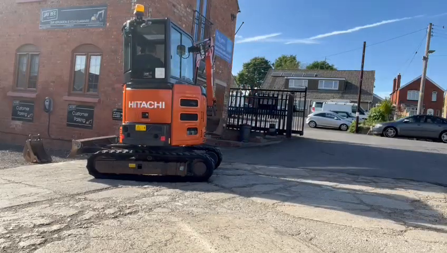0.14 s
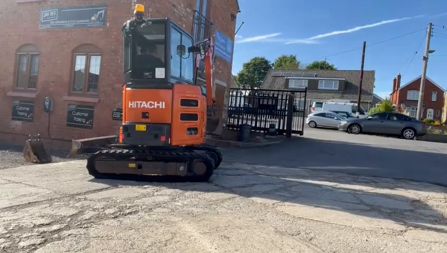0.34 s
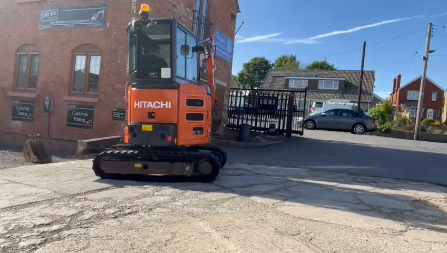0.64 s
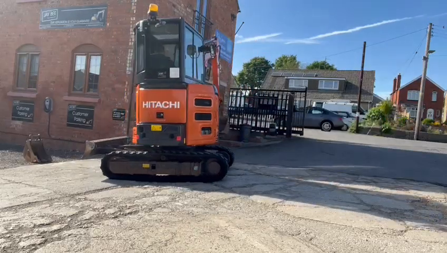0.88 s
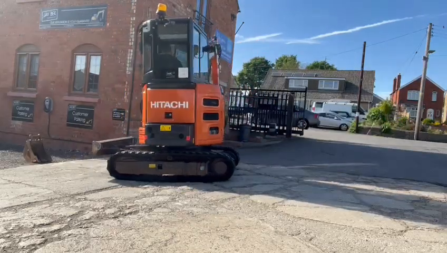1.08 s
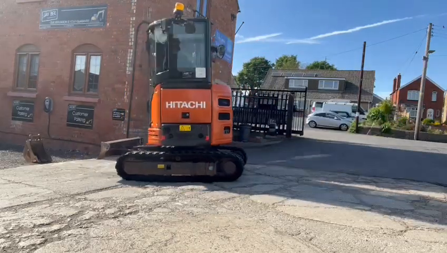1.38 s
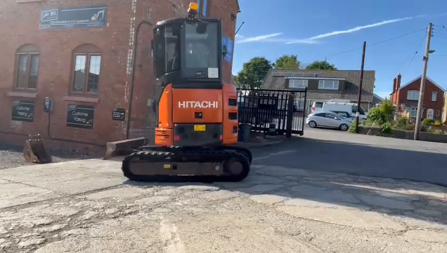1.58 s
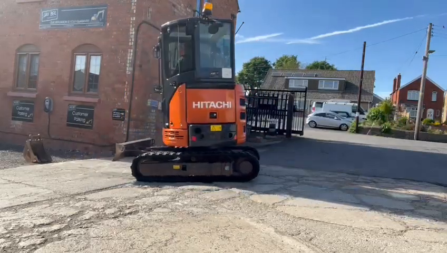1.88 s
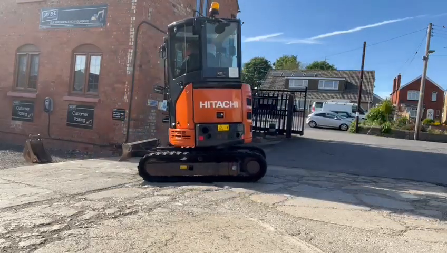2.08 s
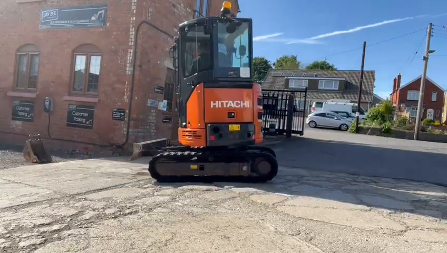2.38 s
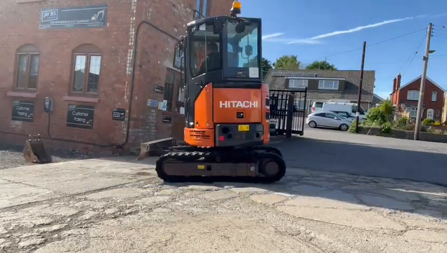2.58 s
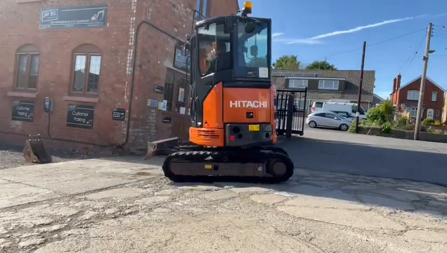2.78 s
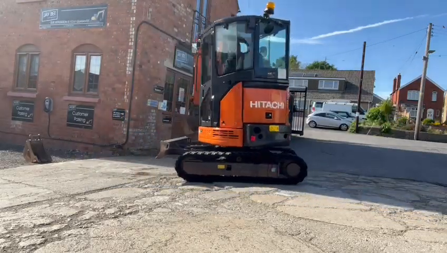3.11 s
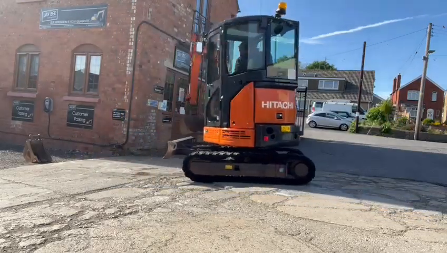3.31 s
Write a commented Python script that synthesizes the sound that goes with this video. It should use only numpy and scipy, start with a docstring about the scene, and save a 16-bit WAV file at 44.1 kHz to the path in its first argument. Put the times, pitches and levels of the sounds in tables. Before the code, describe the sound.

A small digger's diesel engine sags and swells as it turns, its tracks clanking.

```python
"""A mini excavator's three-cylinder diesel sags under hydraulic load and recovers as it turns in a yard.
Exhaust drone and injection knock, both locked to the firings, swell as the engine end swings towards us.
Fan and pump add roar and hiss, and a valve hisses briefly. The tracks clack over broken concrete and
ring their steel, while dull thumps come through a low rumble."""
import sys
import numpy as np
from scipy import signal
from scipy.fft import rfft, irfft, next_fast_len
from scipy.io import wavfile
from scipy.ndimage import uniform_filter1d

SR = 44100
rng = np.random.default_rng(int(sys.argv[2]) if len(sys.argv) > 2 else 0)


def persist_wave(psi):
    """Save psi, clipped to +-1, as 16-bit WAV."""
    counts = np.round(np.clip(psi, -1, 1) * 32767).astype(np.int16)
    wavfile.write(sys.argv[1], SR, np.atleast_2d(counts).T)


N = 152145
T = np.arange(N) / SR
CYLINDERS = 3
KNOCK_DELAY = 0.21  # share of a firing interval from exhaust pulse to knock
SILENCER_LAG_RAD = -.73  # phase at the firing rate; grows with frequency squared
MIC_SPLIT_HZ, MIC_TREBLE_RAD = 6300, -2.17  # above the split, left and right settle at a fixed phase

# engine speed, sagging under load (time [s], firing rate [Hz])
FIRING_RATE = [(0, 54), (.15, 51.5), (.35, 48), (.55, 45), (.8, 44.3), (.95, 48), (1.1, 47.8), (1.3, 47),
               (1.6, 48.1), (2.0, 46.6), (2.4, 48.4), (3.0, 47.7), (3.45, 48.4)]
# exhaust throb at the firing rate (time [s], level [dB])
THROB_LEVEL = [(0, -51), (.65, -52), (.8, -33), (1.4, -38), (1.5, -37), (1.94, -32), (2.03, -21.5),
               (2.5, -25.5), (3.45, -23)]
# exhaust boom an octave above the throb (time [s], level [dB])
BOOM_LEVEL = [(0, -33.5), (.3, -42.5), (.52, -28.5), (.6, -24.5), (.71, -13.5), (.89, -13), (.96, -23),
              (1.12, -17.5), (1.38, -23), (1.5, -27), (1.66, -21.5), (1.8, -21), (1.94, -24), (2.03, -18),
              (2.45, -13), (3.45, -13.5)]
# fader on the exhaust overtones as the pipe swings round (time [s], level [dB])
PIPE_LEVEL = [(0, -20), (.55, -22), (.8, -12), (1.5, -27), (1.9, -14), (2.15, -10), (2.45, -1),
              (3.45, -1.5)]
# exhaust overtones (order [multiple of the three-firing cycle], level against the fader [dB])
PIPE_ORDERS = [(4, -36), (5, -46), (7, -41), (9, -25), (10, -37.5), (12, -24), (13, -35), (15, -36.5),
               (17, -32.5), (18, -39), (20, -34.5), (21, -39.5), (30, -40)]
# injection knock colour (frequency [Hz], gain [dB])
KNOCK_EQ = [(500, 10), (1500, 8.5), (3000, -8.5), (3700, -0.5), (4200, -2), (4700, 3.5), (5300, -2.5),
            (5900, 3), (6600, -13), (7400, -20), (8300, -0.5), (9200, -13.5), (9900, -21), (10600, -5),
            (11600, -9)]
# knock fader (time [s], level [dB])
KNOCK_LEVEL = [(0, -71), (.7, -39.5), (1.3, -42), (1.75, -42.5), (2.1, -34.5), (2.5, -31), (3.0, -32),
               (3.25, -31), (3.45, -33.5)]
# colour of the fan, pump and track roar (frequency [Hz], gain [dB])
ROAR_EQ = [(100, -26), (250, -0.5), (480, 0), (790, -2.5), (920, -3), (1140, -1.5), (1700, -6.5),
           (2250, -8.5), (2700, -15.5), (3200, -12.5), (6000, -60)]
# roar fader (time [s], level [dB])
ROAR_LEVEL = [(0, -35.5), (.58, -34), (.72, -30.5), (.9, -29), (1.0, -28.5), (1.78, -32), (2.01, -28.5),
              (2.47, -27.5), (2.7, -29.5), (3.09, -27.5), (3.45, -32)]
# hydraulic hiss colour (frequency [Hz], gain [dB])
HISS_EQ = [(1500, -12), (2250, 13.5), (2600, 9.5), (3100, 11), (3900, -15), (4700, 5.5), (5700, -2.5),
           (6600, 9.5), (7500, 2.5), (8600, 3.5), (9600, -8.5), (10700, -0.5), (11600, -9)]
# hiss fader (time [s], level [dB])
HISS_LEVEL = [(0, -41.5), (.4, -43), (.75, -40.5), (1.2, -43.5), (1.5, -41.5), (2.05, -39), (2.6, -45),
              (3.45, -40.5)]

# track links hitting the sprocket (time [s], relative level [dB])
CLACK_CUES = [(.296, -28.5), (.645, -26), (.752, -24), (.804, -33), (.894, -27.5), (1.077, -30),
              (1.191, -27), (1.42, -25.5), (1.48, -29.5), (1.686, -25.5), (1.829, -26.5), (1.887, -22),
              (1.921, -27.5), (1.998, -26), (2.042, -26), (2.165, -23.5), (2.209, -25.5), (2.267, -21),
              (2.335, -23.5), (2.577, -26), (2.648, -22), (2.68, -24.5), (2.751, -22.5), (2.826, -26),
              (2.867, -30), (2.917, -24), (2.955, -28), (3.009, -21.5), (3.186, -23.5), (3.209, -27),
              (3.279, -23.5), (3.373, -25), (3.421, -25.5)]
# clack colour (frequency [Hz], gain [dB])
CLACK_EQ = [(200, -35), (450, 7.5), (750, 5.5), (1150, 3), (1600, 1), (2200, -6), (2900, -11), (4000, -8),
            (7000, -18), (11000, -37)]
# ring of the track steel (frequency [Hz], relative level [dB], t60 [s])
STEEL_MODES = [(652, -1, 0.071), (784, -1, 0.12), (995, -2, 0.075), (1129, 1, .11), (1236, -3, .08),
               (1393, -5, 0.06), (1532, -2.5, 0.052), (2060, -4, 0.045)]
# sharp steel ticks in the running gear (time [s], relative level [dB])
TICK_CUES = [(2.917, -22), (3.094, -22.5), (3.108, -27), (3.185, -22), (3.294, -32), (3.326, -23)]
# tick colour (frequency [Hz], gain [dB])
TICK_EQ = [(600, 16), (1300, -11), (2100, 14), (3300, -1), (4500, -42), (8000, -19)]
# dull thumps (time [s], relative body level [dB], bass level [dB])
THUMP_CUES = [(.134, -27.5, -26), (0.295, -21, -16), (0.313, -20, -23.5), (0.343, -30, -29),
              (0.448, -48, -17), (0.897, -20, -19), (0.93, -24, -23), (1.092, -17.5, -17),
              (1.114, -19.5, -34), (1.157, -23.5, -30), (1.233, -25, -18), (1.273, -32, -19),
              (1.329, -18, -22.5), (1.344, -16, -15), (1.383, -22, -20.5), (1.4, -25.5, -22.5),
              (1.564, -20.5, -26), (2.479, -22, -21)]
# body of a thump (frequency [Hz], gain [dB])
THUMP_EQ = [(80, -14), (200, -2), (350, 0), (550, -1), (850, -4), (1400, -14), (2500, -32), (5000, -55)]
# bass thud under a thump (frequency [Hz], gain [dB])
THUD_EQ = [(20, -30), (45, -6), (70, 0.5), (150, -12.5), (250, -10.5), (500, -79)]
# ring of the heavy undercarriage (frequency [Hz], relative level [dB], t60 [s])
FRAME_MODES = [(295.7, -0.5, 0.078), (413, -1.5, 0.062), (563, -2.5, 0.048), (817, -5, 0.041)]

# low rumble colour (frequency [Hz], gain [dB])
RUMBLE_EQ = [(15, -27), (30, -15), (42, -0.5), (65, 7), (85, 0.5), (120, 3.5), (180, -7.5), (280, -10),
             (500, -17.5), (900, -57)]
# rumble fader (time [s], level [dB])
RUMBLE_LEVEL = [(0, -39.5), (.25, -23.5), (.55, -29.5), (.85, -24), (1.35, -25.5), (1.75, -27),
                (2.1, -36.5), (3.45, -25.5)]
# valve hiss colour (frequency [Hz], gain [dB])
VALVE_EQ = [(7000, -46), (8800, -13), (9900, 3), (10800, -7), (11500, -22)]
# valve fader (time [s], level [dB])
VALVE_LEVEL = [(1.48, -66), (1.58, -49), (1.7, -47), (1.8, -67), (2.05, -60), (2.45, -60), (3.45, -58)]

# left-right likeness of fully direct sound (frequency [Hz], coherence [0-1])
COHERENCE = [(50, 0.83), (170, 0.37), (300, 1), (550, 0.34), (1000, 0.9), (2000, 0.99), (4000, 1),
             (6500, 0.53), (9000, 0.18)]
# direct sound; less of it widens the image (time [s], share [0-1])
DIRECT_SHARE = [(0, 1), (1.5, 0.77), (2.2, 1), (2.8, 0.93)]
# the machine's bearing (time [s], lead of the left channel [ms])
LEFT_LEAD = [(0, 0.12), (1.2, 0.11), (1.9, 0.07), (2.3, 0.08), (2.8, 0.04), (3.45, 0)]
# colour of the microphone pair (frequency [Hz], left minus right [dB])
MIC_TILT = [(350, 0), (600, 2.5), (1300, 1), (2200, 0), (3700, -0.5), (4700, 4), (5700, 2), (6900, -5.5),
            (8200, -1), (10000, 0)]


def exhaust(turns, boom_waver=0.063, width_db=-21):
    """The drone: wavering orders of the engine cycle, the higher ones delayed more by the silencer."""
    tones = [(CYLINDERS, amp(curve(THROB_LEVEL))),
             (2 * CYLINDERS, amp(curve(BOOM_LEVEL)) * (1 + boom_waver * drift(27)))]
    for order, db in PIPE_ORDERS:
        tones.append((round(order), amp(curve(PIPE_LEVEL) + db) * (1 + .14 * drift(8))))
    out = np.zeros((2, N))
    for order, level in tones:
        harmonic = order / CYLINDERS
        angle = 2 * np.pi * turns * harmonic + SILENCER_LAG_RAD * harmonic ** 2 + .008 * order * drift(8)
        spread = amp(width_db) * harmonic / 2
        out += np.sqrt(2) * level * np.sin([angle + spread, angle - spread])
    return out


def firings(turns, rise, decay, spread_db):
    """One uneven pulse per firing; rise and decay are shares of the firing interval."""
    number, part = np.divmod(turns + 1 - KNOCK_DELAY, 1)
    strength = amp(spread_db * rng.standard_normal(400))[number.astype(int)]
    return unit(strength * np.minimum(part / rise, 1) * np.exp(-part / decay))


def injection_knock(turns, floor=1.0):
    """Diesel clatter: bright noise that cracks at every firing."""
    crack = firings(turns, rise=.06, decay=.38, spread_db=1.4)
    return noise(KNOCK_EQ, patchy_db=2.5) * unit(floor + crack) * amp(curve(KNOCK_LEVEL))


def fan_and_pump(turns, hiss_floor=2.2, roar_floor=3.9, grit=0.21):
    """Hydraulic hiss and a gritty roar, both pulsing gently with the firings."""
    beat = firings(turns, rise=0.13, decay=0.76, spread_db=2.1)
    hiss = noise(HISS_EQ, patchy_db=1.6) * unit(hiss_floor + beat)
    roar = noise(ROAR_EQ, patchy_db=1.5) * unit((roar_floor + beat) * np.exp(grit * drift(76)))
    return hiss * amp(curve(HISS_LEVEL)) + roar * amp(curve(ROAR_LEVEL))


def tracks(clack_db=-3, tick_db=1, ring_db=1, crunch=0.1):
    """Links clack over the sprockets and ring the steel; a few sharp ticks join late on."""
    clacks = noise(CLACK_EQ, patchy_db=2.5)
    clacks *= blows(CLACK_CUES, attack_s=.0015, decay_s=.016, tail_db=-14, tail_s=.08)
    ticks = noise(TICK_EQ, patchy_db=3)
    ticks *= blows(TICK_CUES, attack_s=0.00039, decay_s=0.0079, tail_db=-26, tail_s=0.014)
    grain = unit(np.exp(crunch * drift(420)))
    ringing = rings(CLACK_CUES, STEEL_MODES) + rings(CLACK_CUES, STEEL_MODES)  # two detuned layers
    return grain * (amp(clack_db) * clacks + amp(tick_db) * ticks) + amp(ring_db) * ringing


def thumps(body_db=-3):
    """Dull blows, each with a bass thud and a short ring of the undercarriage."""
    body_cues = [(start, db) for start, db, _ in THUMP_CUES]
    bass_cues = [(start, db) for start, _, db in THUMP_CUES]
    body = noise(THUMP_EQ, patchy_db=1.5, skew_rad=-1.3)
    body *= blows(body_cues, attack_s=0.0016, decay_s=0.015, tail_db=-17, tail_s=0.067)
    bass = noise(THUD_EQ, patchy_db=0)
    bass *= blows(bass_cues, attack_s=0.0015, decay_s=0.025, tail_db=-26, tail_s=0.066)
    return amp(body_db) * body + bass + rings(THUMP_CUES, FRAME_MODES)


def rumble():
    """A bed of low noise that swells and dips."""
    return noise(RUMBLE_EQ, patchy_db=1, skew_rad=-1.2) * amp(curve(RUMBLE_LEVEL))


def valve():
    """A thin, airy hiss that rises briefly out of a faint trace."""
    return noise(VALVE_EQ, patchy_db=1.5) * amp(curve(VALVE_LEVEL))


def blows(cues, attack_s, decay_s, tail_db, tail_s):
    """Envelope of a run of hits, each with a tail thrown back by the yard wall."""
    power = np.zeros(N)
    for start, db in cues:
        first = int(np.clip(start * SR, 0, N - 1))
        t = T[:min(N - first, SR // 2)]
        shape = np.exp(-2 * t / decay_s) + amp(tail_db) ** 2 * np.exp(-2 * t / tail_s)
        power[first:first + len(t)] += amp(db) ** 2 * np.minimum(t / attack_s, 1) ** 2 * shape
    return np.sqrt(power)


def rings(cues, modes, vary_db=3, detune=.015, scatter_rad=0.32):
    """Struck metal: every hit rings the modes with its own balance and tuning."""
    hz, mode_db, t60 = np.transpose(modes)[:, :, None]
    t, out = T[:SR // 4], np.zeros((2, N))
    attack = (1 - np.exp(-t / .0006)) ** 2
    for start, db, *_ in cues:
        loud, shift, phase, apart = rng.standard_normal((4, len(modes), 1))
        weights = amp(mode_db + vary_db * loud)
        envelopes = amp(db - 60 * t / t60) * weights / np.linalg.norm(weights)
        angle = 2 * np.pi * (hz * (1 + detune * shift) * t + phase)
        lead = np.pi * hz * curve(LEFT_LEAD, start) / 1000 + scatter_rad * apart
        ring = (envelopes * np.sin([angle + lead, angle - lead])).sum(1) * attack
        slot = out[:, round(start * SR):][:, :len(t)]
        slot += ring[:, :slot.shape[1]]
    return out


def noise(eq, patchy_db, skew_rad=0):
    """Flickering stereo noise of rms 1; skew_rad shifts left against right above the bass."""
    frames, hz = N // 256 + 5, np.fft.rfftfreq(1024, 1 / SR)
    t = np.arange(frames)[:, None] * 256 / SR
    mid_re, mid_im, side_re, side_im, patches = rng.standard_normal((5, frames, len(hz)))
    patches = unit(uniform_filter1d(uniform_filter1d(patches, size=3, axis=0), size=9, axis=1))
    above_bass = np.clip((hz - 100) / 200, 0, 1)
    coherence = np.clip(at_hz(COHERENCE, hz) * (1 + above_bass * (curve(DIRECT_SHARE, t) - 1)), 0, 1)
    mid = (mid_re + 1j * mid_im) * np.sqrt(1 + coherence)
    side = (side_re + 1j * side_im) * np.sqrt(1 - coherence)
    arrival = 2 * np.pi * np.minimum(hz, MIC_SPLIT_HZ) * curve(LEFT_LEAD, t) / 1000
    treble = np.clip((hz - MIC_SPLIT_HZ) / 1200 + .3, 0, 1)
    phase = arrival + np.angle(1 - treble + treble * np.exp(1j * (MIC_TREBLE_RAD - arrival)))
    pan = amp(at_hz(MIC_TILT, hz) / 2) * np.exp(.5j * (phase + skew_rad * above_bass))
    spectra = np.array([(mid + side) * pan, (mid - side) / pan]) * amp(patchy_db * patches)
    white = signal.istft(spectra.swapaxes(1, 2), nperseg=1024, noverlap=768)[1][:, :N]
    size = next_fast_len(N)
    colour = amp(at_hz(eq, np.fft.rfftfreq(size, 1 / SR)))
    return unit(irfft(rfft(white, size) * colour, size)[:, :N])


def drift(hz):
    """Random modulation of rms 1, rolled off above the given rate."""
    size = next_fast_len(N)
    f = np.fft.rfftfreq(size, 1 / SR)
    return unit(irfft(rfft(rng.standard_normal(size)) / (1 + (f / hz) ** 4), size)[:N])


def curve(points, t=T):
    """An automation curve at the given times."""
    return np.interp(t, *np.transpose(points))


def at_hz(points, hz):
    """A table interpolated along log frequency."""
    f, value = np.transpose(points)
    return np.interp(np.log(hz + 1), np.log(f + 1), value)


def amp(db):
    """Decibels to gain."""
    return 10 ** (np.asarray(db) / 20)


def unit(x):
    """Scales to rms 1."""
    return x / np.sqrt(np.mean(x ** 2) + 1e-20)


def scene():
    """The mix: diesel up front, then running gear, rumble and valve."""
    turns = np.cumsum(curve(FIRING_RATE)) / SR  # one turn of phase per firing
    engine = exhaust(turns) + injection_knock(turns) + fan_and_pump(turns)
    return engine + tracks() + thumps() + rumble() + valve()


def record(dry):
    """A steep high cut takes the air off the top."""
    high_cut = signal.firwin(511, cutoff=11720, window=("kaiser", 9), fs=SR)
    return signal.oaconvolve(dry, high_cut[None], "same")


dry = scene()
out = record(dry)
persist_wave(out)
```